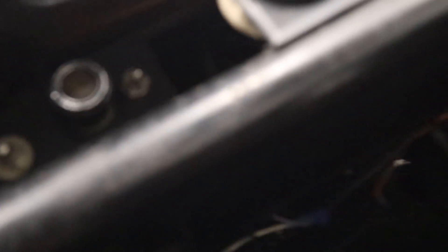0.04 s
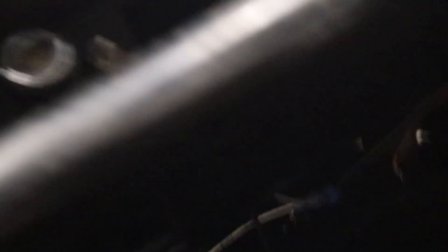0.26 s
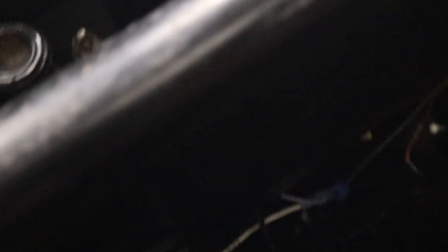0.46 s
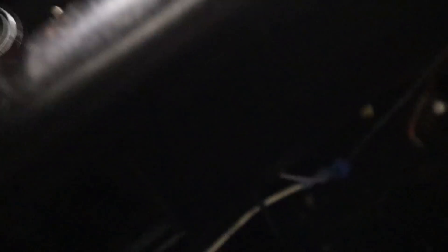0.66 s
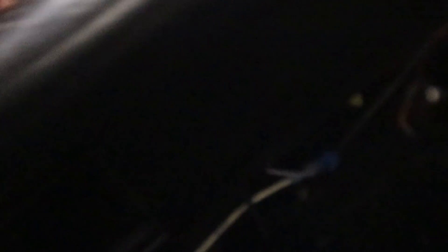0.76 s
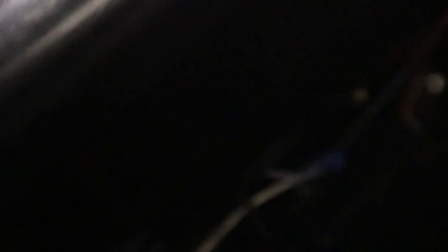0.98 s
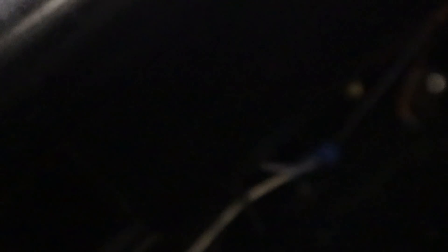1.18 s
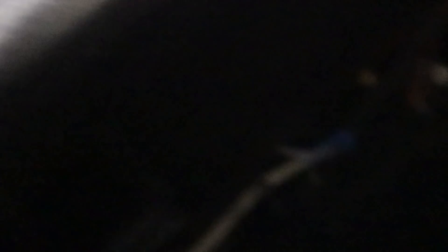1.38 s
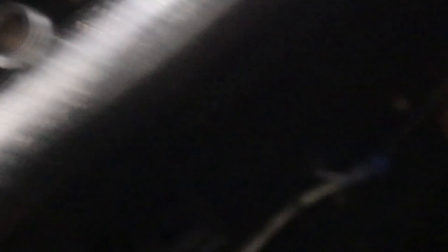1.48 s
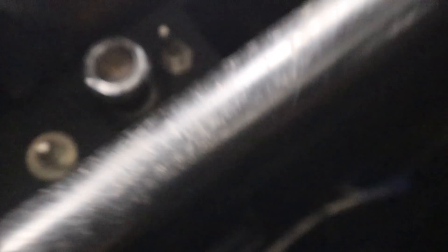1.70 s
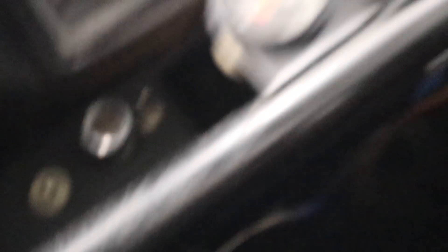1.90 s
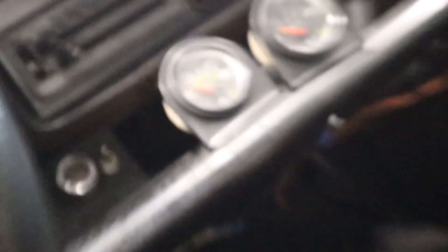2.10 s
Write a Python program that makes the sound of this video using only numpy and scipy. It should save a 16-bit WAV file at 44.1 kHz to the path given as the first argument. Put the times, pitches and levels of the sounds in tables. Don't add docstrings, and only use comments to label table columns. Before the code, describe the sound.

Low buzzing motor hum fills the second half inside a quiet car cabin, set off by a hard click; earlier only cloth rustle, a short scrape and tiny ticks over faint rumble, heard close in wide stereo.

```python
import sys
import numpy as np
from scipy import signal
from scipy.fft import rfft, irfft
from scipy.io import wavfile
from scipy.ndimage import uniform_filter1d

SR = 44100
rng = np.random.default_rng(int(sys.argv[2]) if len(sys.argv) > 2 else 0)


def wav_out(sig):
    wavfile.write(sys.argv[1], SR, np.round(np.clip(np.atleast_2d(sig).T, -1, 1) * 32767).astype(np.int16))


def undo_db(level):
    steps = np.asarray(level, float) / 20
    return 10 ** steps


N = 94726


def evened(x):
    return x / np.sqrt(np.mean(x ** 2) + 1e-20)


def read(points, hz):
    f, value = np.transpose(points)
    return np.interp(np.log(hz + 1), np.log(f + 1), value)


def over_time(points, t_s):
    return np.interp(t_s, *np.transpose(points))


def coloured(x, points):
    gain = undo_db(read(points, np.fft.rfftfreq(x.shape[-1], 1 / SR)))
    return irfft(rfft(x) * gain, x.shape[-1])


def noise_pair():
    return rng.standard_normal((2, N))


def slow(rate_hz, count):
    t_s = np.arange(0, N + 64, 64) / SR
    f_hz = np.geomspace(rate_hz / 12, rate_hz, 16)
    cycles = f_hz[:, None] * t_s + rng.random((count, 16, 1))
    rows = np.sin(2 * np.pi * cycles).sum(1) / np.sqrt(8)
    return np.repeat(rows, 64, axis=1)[:, :N]


def resonate(x, hz, width_hz):
    turn = np.exp(2j * np.pi * hz * np.arange(x.shape[-1]) / SR)
    r = np.exp(-np.pi * width_hz / SR)
    return 2 * (turn * signal.lfilter([1 - r], [1, -r], x / turn)).real


def resonate_twice(x, hz, width_hz):
    return resonate(resonate(x, hz, width_hz), hz, width_hz)


def grains(grainy_db):
    slip_size = np.minimum(rng.exponential(1, N), 4)
    return noise_pair() * undo_db(grainy_db * slip_size)


def strokes(rows, rise, fall):
    level = np.zeros(N)
    for start_s, length_s, db in rows:
        u = (np.arange(N) / SR - start_s) / length_s
        ramp = np.minimum(u / rise + .5, (1 - u) / fall + .5)
        level += undo_db(db) * np.clip(ramp, 0, 1) ** 2
    return level


def cabin():
    # (frequency [Hz], density [dB per Hz])
    rumble_spectrum = [(14, -38.5), (25, -13), (48, 5), (81, -3), (113, -2.5), (168, -24.5), (300, -26.5),
                       (420, -74.5)]
    # (time [s], level [dB])
    rumble_level = [(0, -48), (.15, -54), (.4, -52.5), (.6, -57.5), (1, -60.5), (1.3, -60.5), (2.15, -58.5)]
    # (frequency [Hz], density [dB per Hz])
    air_spectrum = [(88, -26.5), (150, -5), (468, -12.5), (685, -9.5), (945, -12.5), (1040, -16),
                    (2440, -20.5), (10900, -35), (14000, -37)]
    # (time [s], level [dB])
    air_level = [(0, -2.5), (.2, -1), (.3, 1)]
    hum_db, air_db = -62.5, -69.5
    t_s = np.arange(N) / SR
    rumble = evened(coloured(noise_pair(), rumble_spectrum)) * undo_db(over_time(rumble_level, t_s))
    hum = undo_db(hum_db) * evened(resonate_twice(noise_pair(), hz=106.9, width_hz=7.2))
    drift_db = 1.0 * slow(9.2, count=1)
    air = evened(coloured(noise_pair(), air_spectrum))
    return rumble + hum + air * undo_db(air_db + over_time(air_level, t_s) + drift_db)


def skin_slides():
    # (start [s], length [s], level [dB])
    slides = [
        (0.2394, 0.097, -50),
        (1.11, 0.017, -66),
        (0.361, 0.039, -67.5),
    ]
    # (start [s], length [s], level [dB])
    sweeps = [
        (.75, 0.084, -56.5),
        (.81, 0.14, -64),
    ]
    # (frequency [Hz], density [dB per Hz])
    slide_spectrum = [(88, -53), (150, -22), (876, -7), (1140, -16.5), (1440, -7.5), (2180, -5),
                      (4660, -17.5), (11800, -37), (14500, -26.5)]
    # (frequency [Hz], width [Hz], level [dB])
    slide_rings = [(2160, 120, 1), (3150, 200, -4.5), (1500, 150, -5.5)]
    skin = grains(2.4)
    rings = sum(undo_db(db) * evened(resonate(skin, hz, width_hz)) for hz, width_hz, db in slide_rings)
    flutter = undo_db(.8 * slow(60, count=1))
    slide = evened(evened(coloured(skin, slide_spectrum)) + .4 * rings)
    sweep = evened(coloured(grains(1.6), slide_spectrum))
    return slide * strokes(slides, 0.29, 0.22) * flutter + sweep * strokes(sweeps, 0.84, 0.84)


def scrape():
    # (start [s], length [s], level [dB])
    scrapes = [
        (.329, 0.045, -43.5),
    ]
    # (frequency [Hz], density [dB per Hz])
    scrape_spectrum = [(71, -39), (120, 5), (284, 4), (687, -13), (1840, 0), (2530, -5.5), (3420, 0.5),
                       (10300, -15), (14500, -10.5)]
    # (frequency [Hz], width [Hz], level [dB], start [s], length [s])
    squeaks = [(297, 45, 3, .33, 0.013), (511, 28, 0, .33, .03), (847, 48, 1, .353, 0.024),
               (1895, 32, 2, .335, 0.04), (3420, 45, 1, .335, 0.033)]
    rough = grains(4.1)
    rings = np.zeros((2, N))
    for hz, width_hz, db, start_s, length_s in squeaks:
        rings += evened(resonate(rough, hz, width_hz)) * strokes([(start_s, length_s, db)], 0.22, .4)
    return (evened(coloured(rough, scrape_spectrum)) + 0.36 * rings) * strokes(scrapes, 0.17, 0.37)


def sleeve():
    # (start [s], length [s], level [dB])
    rubs = [
        (0, 0.26, -63),
        (.2, 0.15, -68),
    ]
    # (frequency [Hz], density [dB per Hz])
    rub_spectrum = [(90, -35), (150, 1), (500, -16), (714, -6.5), (1650, -18), (2200, -34), (5000, -66)]
    # (start [s], length [s], level [dB])
    hisses = [(.411, 0.0071, -69), (.435, 0.084, -68), (.65, 0.13, -65.5), (.76, 0.19, -61.5),
              (.93, .05, -88), (1.035, 0.074, -78.5), (1.32, 0.08, -67), (1.59, 0.11, -68),
              (1.735, 0.048, -67), (.236, 0.11, -59.5)]
    # (frequency [Hz], density [dB per Hz])
    cloth_spectrum = [(1180, -47), (2000, 0.5), (2750, -6), (2930, -3), (3340, -4), (11000, -3.5),
                      (14000, -7)]
    rub = evened(coloured(grains(0.86), rub_spectrum)) * strokes(rubs, 0.93, 0.15)
    hiss = evened(coloured(grains(3.0), cloth_spectrum)) * strokes(hisses, 0.35, 1.0)
    return rub + hiss * undo_db(1.5 * slow(40, count=1))


def small_ticks():
    # (time [s], peak [dB], lowest frequency [Hz], t60 [s])
    ticks = [(.209, -45, 2900, 0.012), (0.244, -40, 300, 0.015), (.752, -41, 3000, 0.0049),
             (1.077, -60, 7150, 0.0086), (1.518, -49, 595, 0.0094), (1.607, -52, 1740, 0.0071),
             (1.648, -56, 1500, .008), (1.816, -40, 1800, 0.028), (1.821, -36.5, 1700, 0.016)]
    out = np.zeros((2, N))
    t_s = np.arange(2000) / SR
    for at_s, peak_db, low_hz, t60_s in ticks:
        noise = rng.standard_normal((2, len(t_s)))
        burst = evened(coloured(noise, [(low_hz * 0.37, -40), (low_hz, 0), (12500, -10), (14800, -40)]))
        peak_to_rms_db = 11
        out[:, round(at_s * SR):][:, :len(t_s)] += undo_db(peak_db - peak_to_rms_db - 60 * t_s / t60_s) * burst
    return out


def hand():
    return skin_slides() + scrape() + sleeve() + small_ticks()


def switch():
    # (time after snap [s], level [dB])
    blows = [(0, 1), (.0009, 3), (.0022, 4.5), (.0052, -3), (.0068, -18.5), (.012, -7.5), (0.021, -16.5)]
    # (frequency [Hz], density [dB per Hz])
    crack_spectrum = [(150, -44.5), (330, -19), (600, -11), (1240, -11), (2000, -4.5), (3300, -8),
                      (4800, -16), (11000, -24), (13000, -31.5), (15100, -51)]
    # (frequency [Hz], density [dB per Hz])
    contact_spectrum = [(3000, -27), (6500, -0.5), (10500, -2), (13000, -25.5)]
    # (frequency [Hz], t60 [s])
    cabin_t60 = [(200, 0.6), (500, 0.18), (1000, 0.12), (2000, 0.089), (3300, 0.083), (5000, .065),
                 (14000, 0.07)]
    # (frequency [Hz], level [dB], t60 [s])
    panel_modes = [(274, -11, .12), (348, -9, 0.2), (502, -8, .12), (556, 2, 0.09), (705, -3.5, 0.12),
                   (768, -6, 0.09), (925, -12, 0.15), (1517, -2, 0.08), (1727, -3, .07), (1887, -1, 0.055),
                   (2152, -5, 0.082), (2820, -8, .09), (3083, -4, 0.09), (3229, -4, 0.07)]
    # (frequency [Hz], level [dB], t60 [s])
    dash_modes = [(149, -35.5, 0.14), (225, -35, .25), (1030, -29, .06)]
    # (frequency [Hz], level [dB])
    snap_side = [(500, -9), (1000, -6), (1800, -3), (3500, -3), (9000, 0.5), (13000, 8.5)]
    crack_db, contact_db, tail_db, panel_db = -14, -7, -20, -21
    crack_t60_s, contact_t60_s = 0.0084, 0.0069
    linger_db, linger_times_slower = -29, 3.8
    panel_rise_cycles = 2.5
    t_s, start = np.arange(12000) / SR, round(1.1405 * SR)
    n = len(t_s)
    white = noise_pair()

    hz, frames_s, z = signal.stft(evened(coloured(white[:, :n], crack_spectrum)), SR, nperseg=256)
    fall_db = -60 * frames_s / read(cabin_t60, hz)[:, None]
    decay = undo_db(fall_db) + undo_db(linger_db + fall_db / linger_times_slower)
    tail = signal.istft(z * decay, SR, nperseg=256)[1][:, :n]

    ring, thump = np.zeros((2, n)), np.zeros((2, n))
    for f_hz, db, t60_s in panel_modes:
        swell = np.minimum(f_hz * t_s / panel_rise_cycles, 1)
        ring += undo_db(db - 60 * t_s / t60_s) * swell * np.sin(2 * np.pi * (f_hz * t_s + rng.random((2, 1))))
    for f_hz, db, t60_s in dash_modes:
        thump += undo_db(db - 60 * t_s / t60_s) * np.sin(2 * np.pi * f_hz * t_s) * [[1], [.3]]
    contact = evened(coloured(white[:, -n:], contact_spectrum)) * undo_db(contact_db - 60 * t_s / contact_t60_s)

    body = np.zeros((2, N))
    resonance = undo_db(tail_db) * tail + undo_db(panel_db) * ring
    body[:, start:start + n] = resonance * np.minimum(t_s / 0.00047, 1) + contact + thump
    envelope = np.zeros((2, N))
    for after_s, db in blows:
        fall = undo_db(db - 60 * abs(t_s - after_s) / crack_t60_s)
        envelope[:, start:start + n] += fall * (t_s >= after_s)
    onset = np.clip((np.arange(N) - start) / SR / 0.0023, 0, 1)
    crack = coloured(envelope * white, crack_spectrum) / np.std(coloured(white, crack_spectrum))
    mid, other = undo_db(crack_db) * onset * crack + body
    return np.array([mid, coloured(other, snap_side)])


def motor():
    # (time [s], shaft speed [Hz], eighth order [dB], overall level [dB])
    run_up = [(1.161, 24.18, -59, 0), (1.199, 24.33, -46.5, -0.5), (1.232, 24.97, -36.5, -0.5),
              (1.255, 25.17, -42, 0), (1.275, 26.49, -50, -0.5), (1.3, 27.8, -44.5, -1),
              (1.347, 28.19, -40.5, -1), (1.42, 28.29, -43, -2.5), (1.468, 28.29, -41.5, -2),
              (1.507, 29.21, -54, -4), (1.566, 29.32, -36.5, -2), (1.614, 29.35, -35.5, -2.5),
              (1.699, 29.62, -37.5, -1), (1.9, 29.35, -40, -0.5), (2.147, 29.92, -44.5, -0.5)]
    early_orders = [-22, -29.5, -28, -7, -12.5, -20, -11, 0, -17, -16, -26.5, -14.5, -9.5, -16.5, -12.5,
                    -15.5, -19, -19.5, -21.5, -27, -25, -34]
    late_orders = [-26, -26, -13.5, -3, -7.5, -8, -8.5, 7, -10, -20.5, -9, -13, -8.5, -14.5, -14.5, -6,
                   -17.5, -18, -26, -30, -16.5, -40]
    # (frequency [Hz], density [dB per Hz])
    brush_spectrum = [(60, -32.5), (200, -14.5), (450, -10), (850, -20), (1070, -28.5), (1280, -21.5),
                      (1550, -24.5), (1900, -33), (4200, -38.5), (10000, -51.5)]
    # (frequency [Hz], width [Hz], level [dB])
    housing = [(100, 14, -2), (230, 20, -5), (365, 14, 1), (478, 9, -1), (540, 12, -7), (280, 30, -10),
               (420, 14, -5)]
    # (time [s], level [dB])
    housing_level = [(1.16, -43), (1.2, -44.5), (1.25, -43.5), (1.3, -46.5), (1.45, -44.5), (1.55, -55.5),
                     (2.15, -56)]
    on_s, rise_s, settle_s, settle_length_s = 1.15, 0.049, 1.433, 0.086
    orders_db, wander_db, wobble_rad = -41.5, 1, 0.2
    high_db, high_fall_db = -26.5, 0.5
    spin_up_db_per_hz, free_hz = 2, 27.8
    pulse_spread_turns = .55
    brushes_db, brush_swell_db_per_s, brush_gate = -52.5, 2, 0.14

    t_s = np.arange(N) / SR
    at_s, speed_hz, eighth_db, level_db = np.transpose(run_up)
    shaft_hz = np.interp(t_s, at_s, speed_hz)
    turns = np.cumsum(shaft_hz) / SR
    level = undo_db(np.interp(t_s, at_s, level_db))
    settled = np.clip((t_s - settle_s) / settle_length_s, 0, 1)
    spin_up = undo_db(-spin_up_db_per_hz * np.maximum(free_hz - shaft_hz, 0))

    wander, wobble = slow(16, count=40), slow(14, count=40)
    spread = np.where(np.arange(1, 41) % 4, pulse_spread_turns, .1)[:, None, None]
    start_turns = rng.random((40, 2, 1)) * spread + [[-.25], [.05]]
    high = list(high_db - high_fall_db * np.arange(18) + 3 * rng.standard_normal(18))
    out = np.zeros((2, N))
    for k, (early_db, late_db) in enumerate(zip(early_orders + high, late_orders + high)):
        order_db = early_db + (late_db - early_db) * settled
        size = level * undo_db(orders_db + order_db + wander_db * (2.0 - settled) * wander[k])
        if k > 8:
            size = size * spin_up
        if k == 7:
            size = undo_db(np.interp(t_s, at_s, eighth_db))
        stray_rad = wobble_rad * (1 + 5 * (1 - settled)) * uniform_filter1d(wobble[k], size=128)
        phase_rad = 2 * np.pi * ((k + 1) * turns + start_turns[k]) + stray_rad
        out += np.sqrt(2) * uniform_filter1d(size, size=128) * np.sin(phase_rad)

    chop = 1 - brush_gate + brush_gate * 3 * np.exp(-(4 * turns % 1) / .3)
    brushes = evened(coloured(chop * noise_pair(), brush_spectrum))
    out += brushes * level * undo_db(brushes_db + brush_swell_db_per_s * (t_s - 0.25))
    rings = sum(undo_db(db) * evened(resonate_twice(brushes, hz, width_hz)) for hz, width_hz, db in housing)
    out += evened(rings) * undo_db(over_time(housing_level, t_s))
    return out * np.clip((t_s - on_s) / rise_s, 0, 1)


def scene():
    # (frequency [Hz], share of mid leaning left)
    lean_left = [(300, -0.1), (1000, .05), (3000, 0.03), (12000, 0)]
    # (frequency [Hz], side over mid [dB])
    side_width = [(60, -33), (130, -26), (290, -11), (630, -6), (1390, 2.5), (3050, 4.5), (6700, 6.5),
                  (14000, 4)]
    # (frequency [Hz], level [dB])
    mid_top = [(12900, 0), (13400, -13), (15500, -22)]
    # (frequency [Hz], level [dB])
    side_top = [(13600, 0), (15200, -16)]
    mid, other = cabin() + hand() + switch() + motor()
    lean = np.clip(read(lean_left, np.fft.rfftfreq(N, 1 / SR)), -1, 1)
    side = irfft(lean * rfft(mid) + np.sqrt(1 - lean ** 2) * rfft(other), N)
    side = coloured(coloured(side, side_width), side_top)
    mid = coloured(mid, mid_top)
    return np.array([mid + side, mid - side])


def roll_off(x):
    return signal.sosfilt(signal.butter(12, 15290, fs=SR, output="sos"), x)


def record(dry):
    # (frequency [Hz], level [dB])
    band_edge = [(15500, 0), (16200, -60)]
    mix = coloured(np.clip(dry, -1, 1), band_edge)
    return roll_off(mix)


dry = scene()
out = record(dry)
wav_out(out)
```